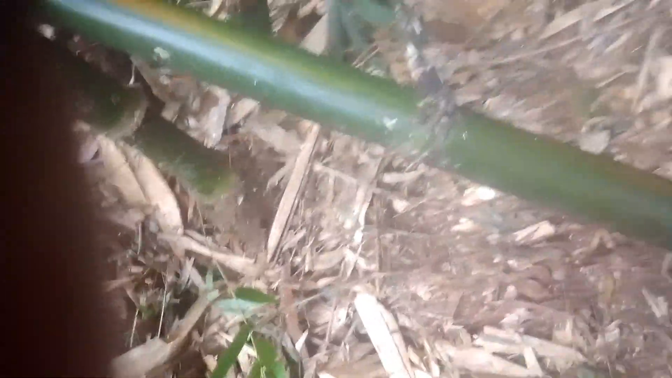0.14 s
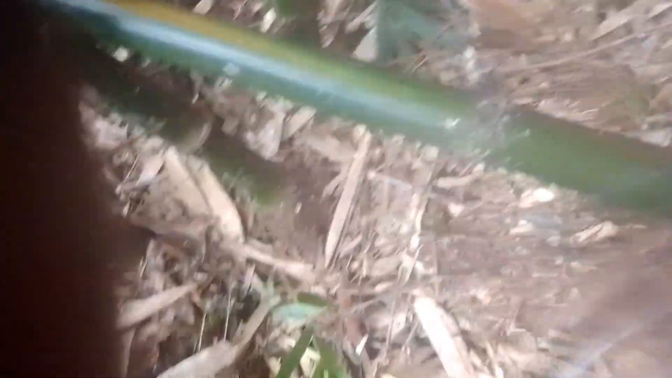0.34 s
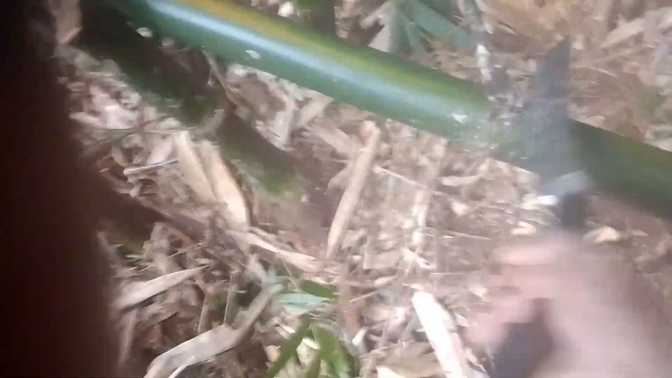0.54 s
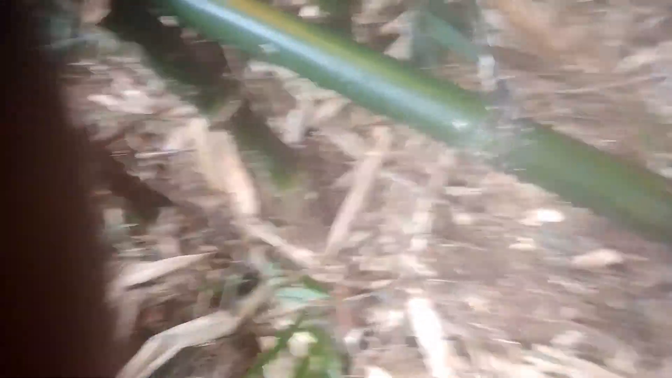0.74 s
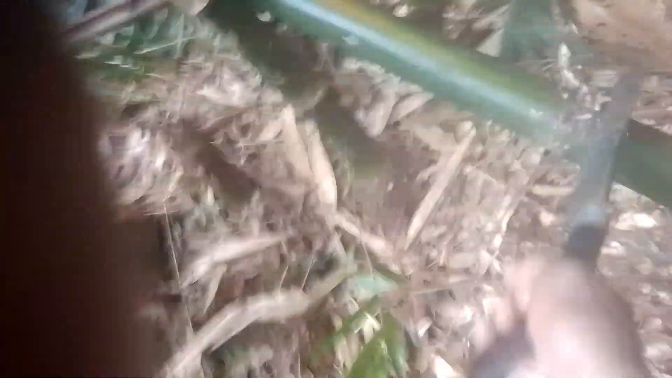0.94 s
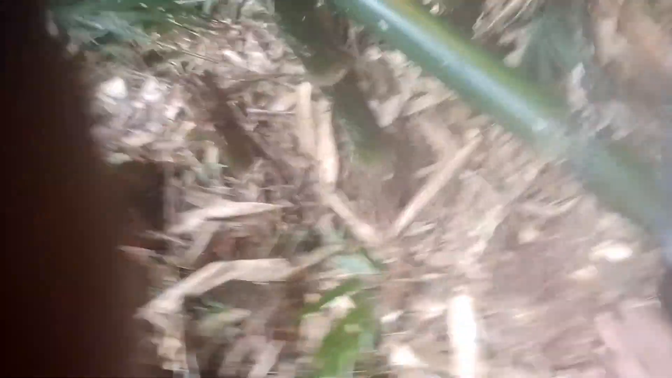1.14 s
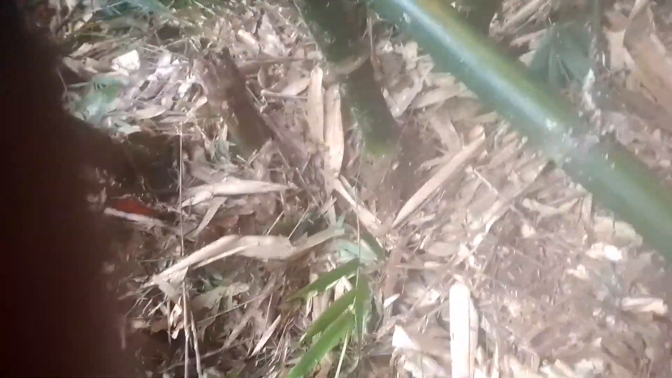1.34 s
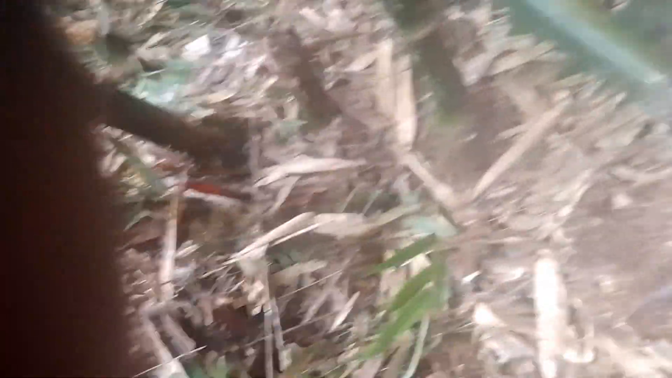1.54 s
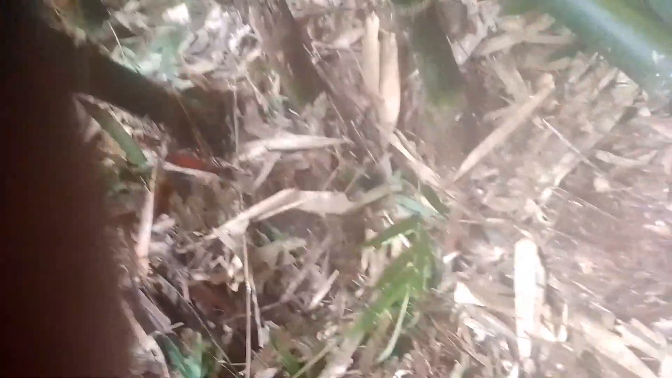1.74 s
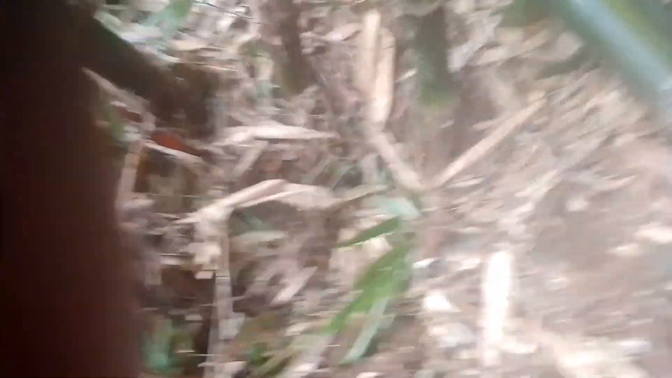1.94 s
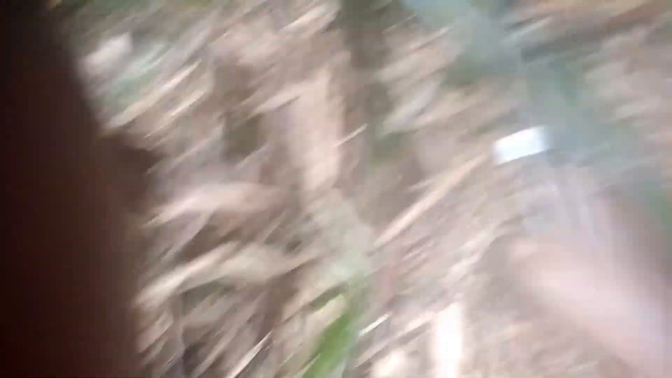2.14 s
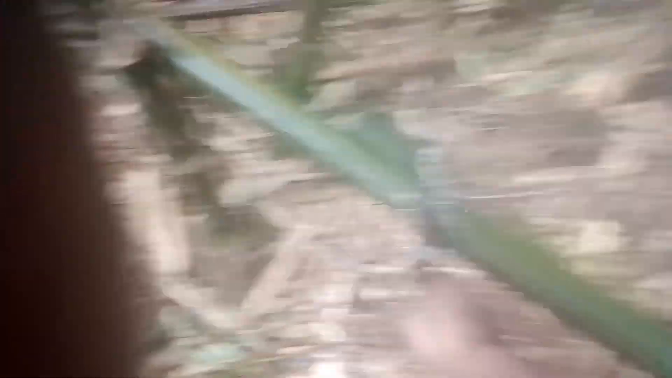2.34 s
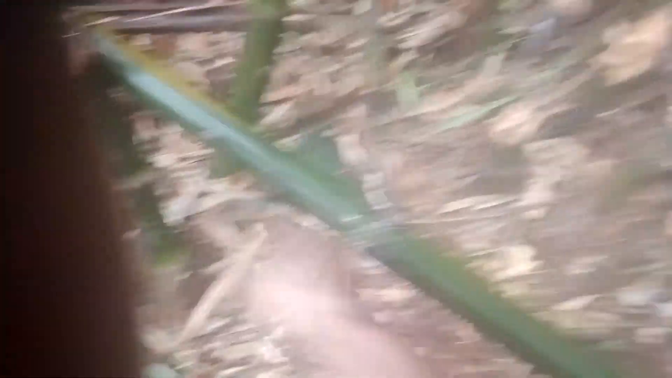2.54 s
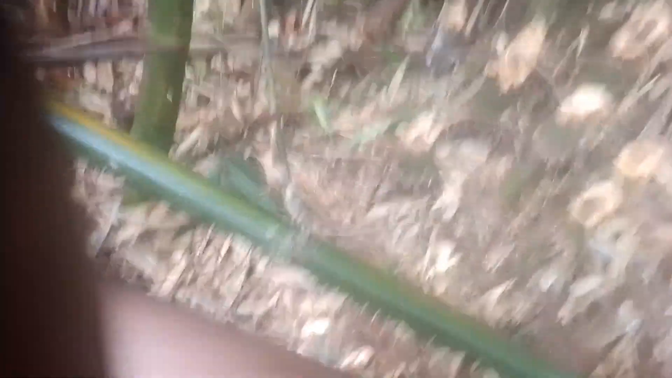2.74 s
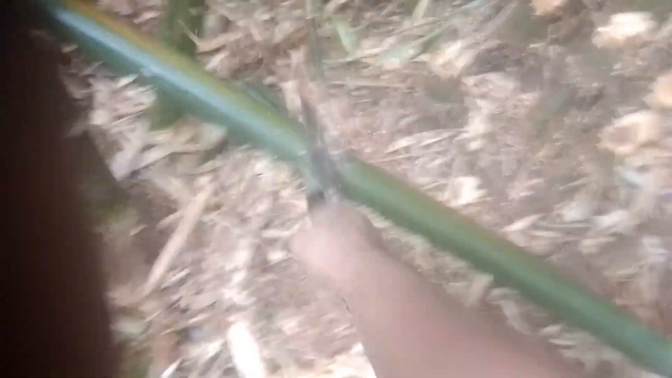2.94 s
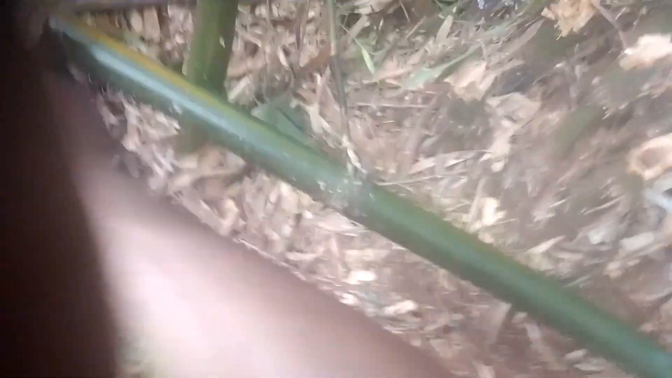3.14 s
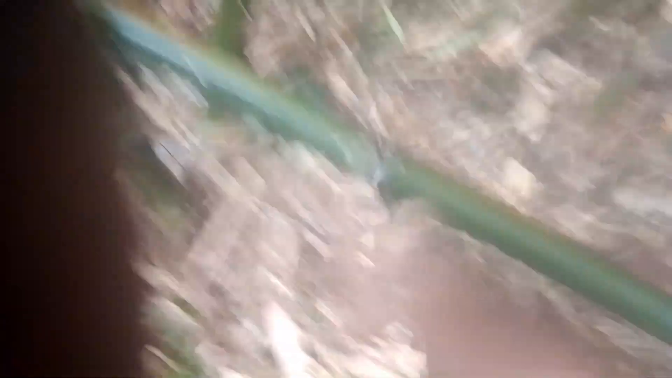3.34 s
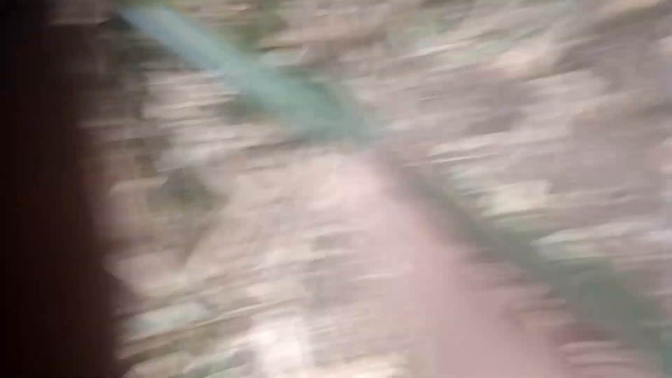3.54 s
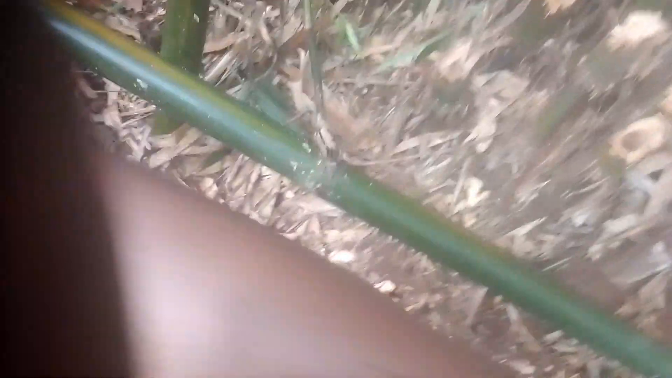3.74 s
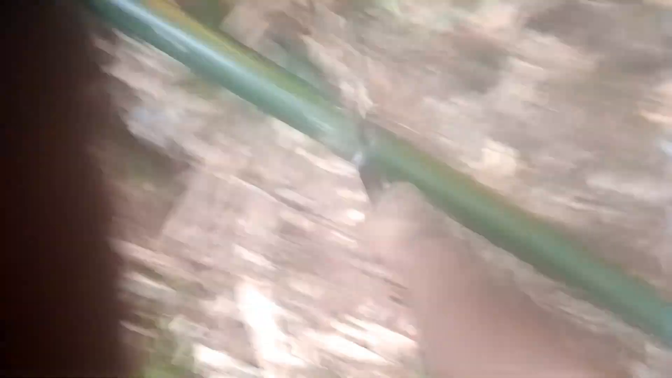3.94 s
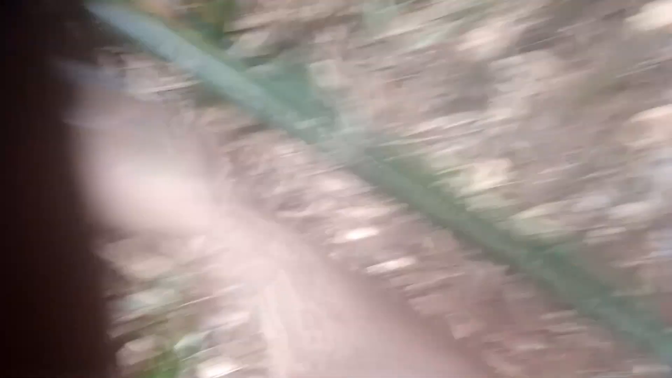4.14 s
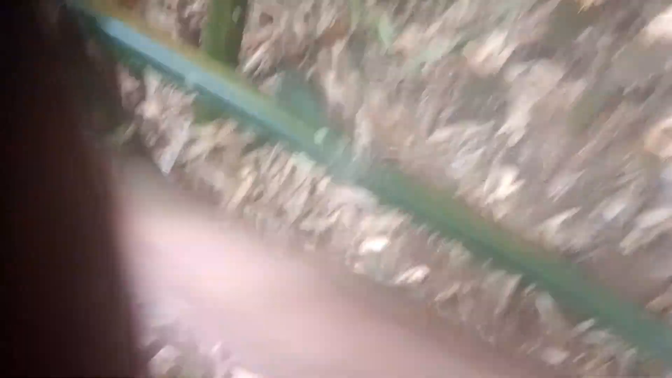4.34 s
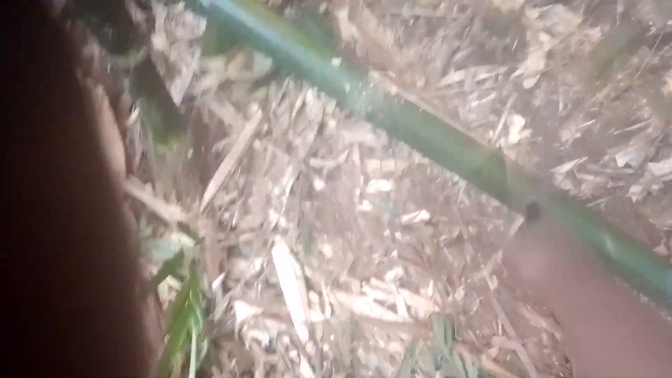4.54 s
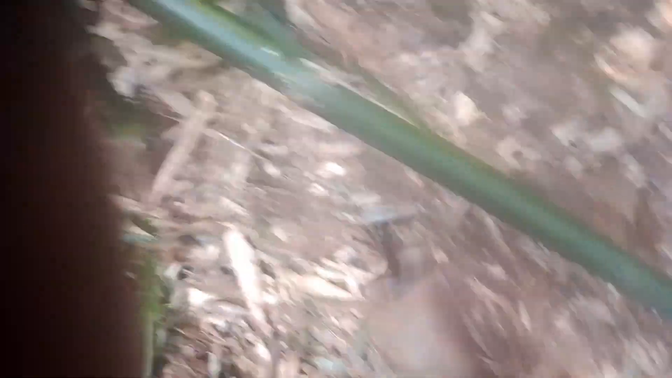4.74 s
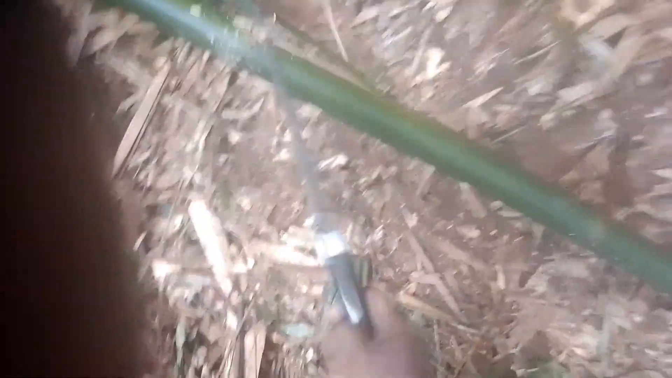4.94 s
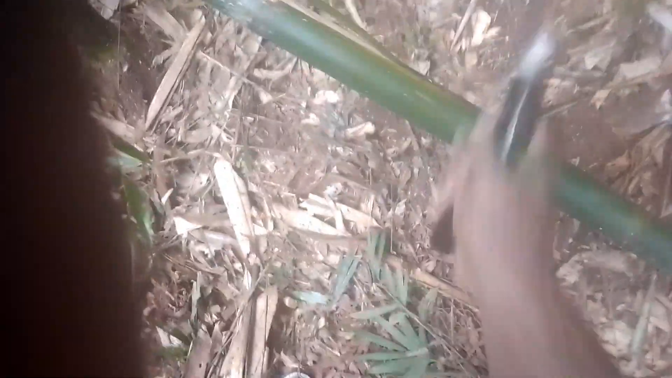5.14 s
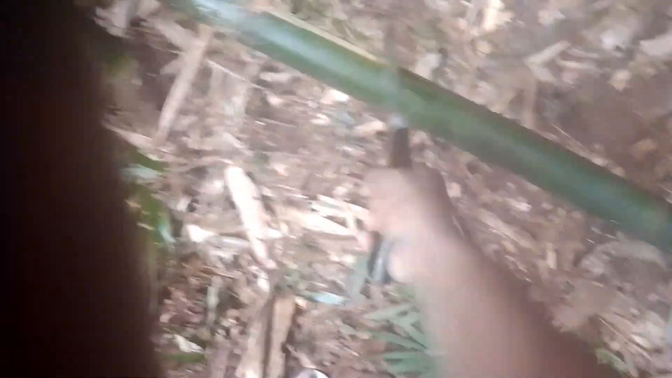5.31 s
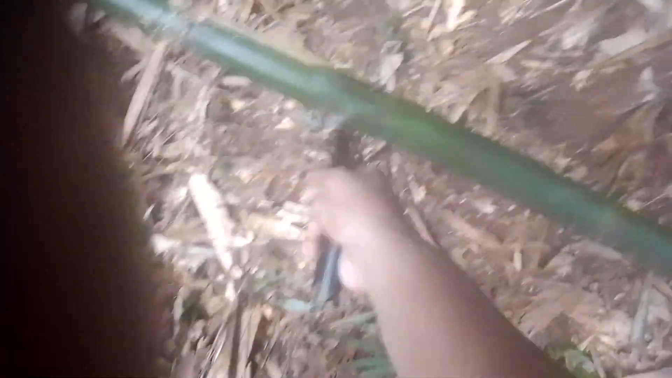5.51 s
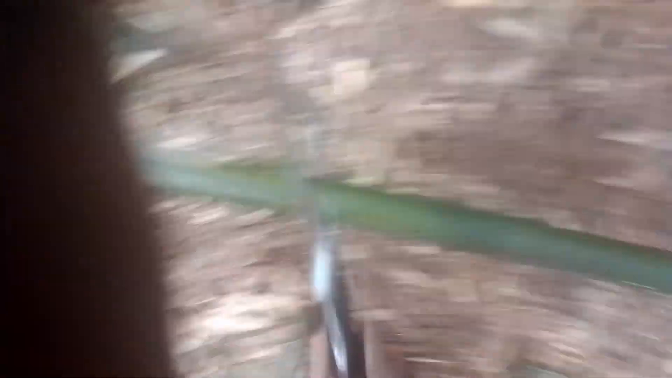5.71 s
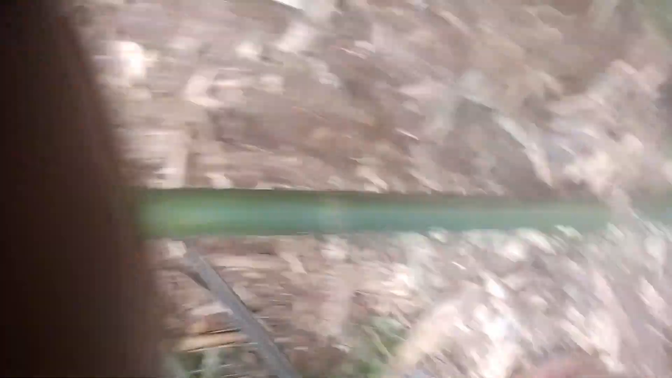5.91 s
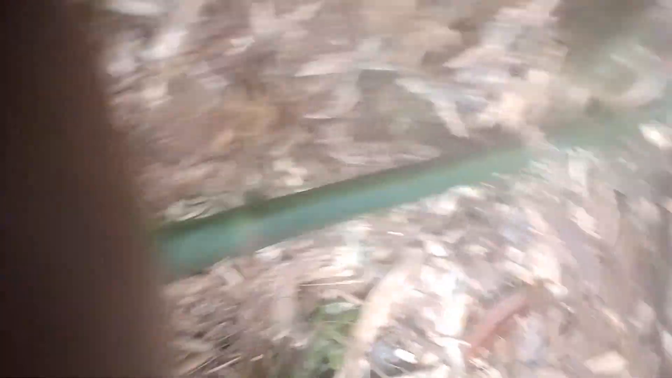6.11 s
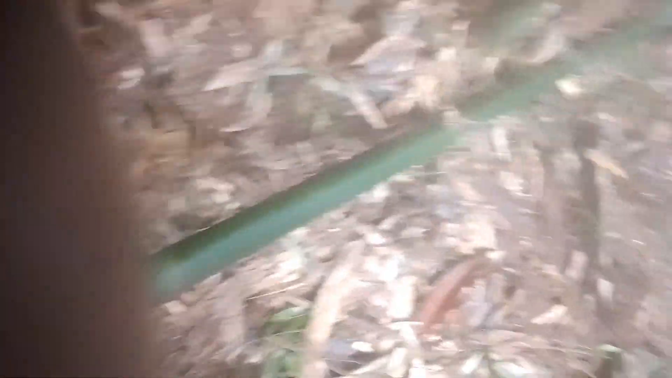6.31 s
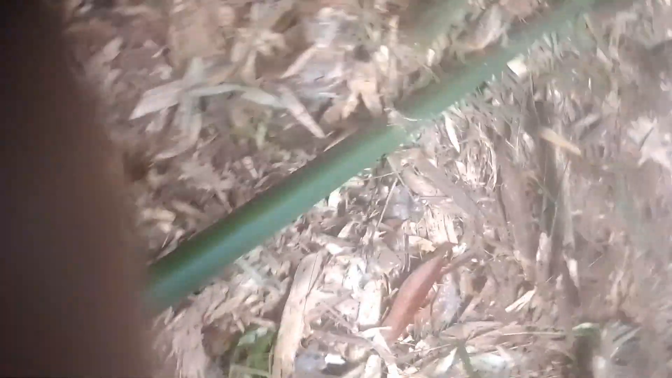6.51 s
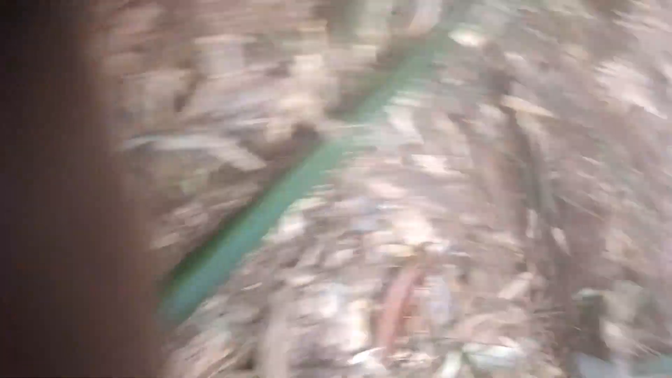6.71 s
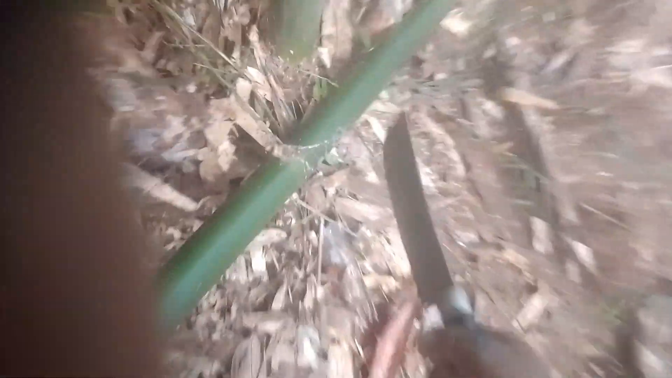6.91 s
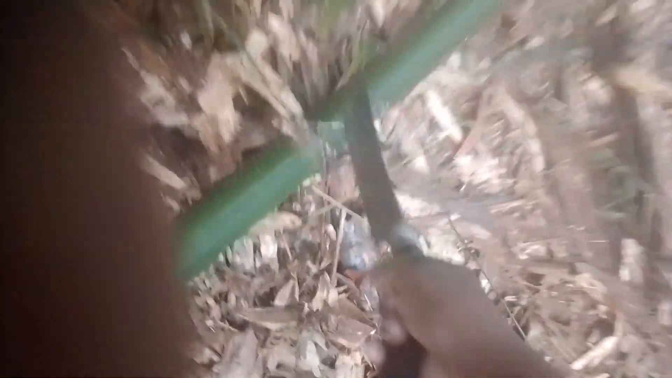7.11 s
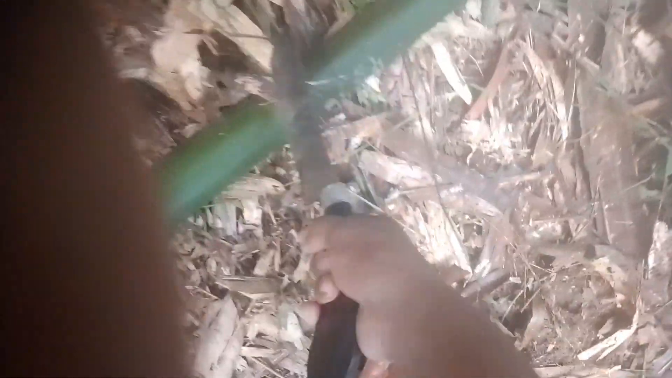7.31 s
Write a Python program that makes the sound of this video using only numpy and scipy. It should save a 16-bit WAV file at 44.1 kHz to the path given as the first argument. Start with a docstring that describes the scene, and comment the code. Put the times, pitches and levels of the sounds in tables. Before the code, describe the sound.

Hard, close knife strikes ring on hollow bamboo in a leafy grove; the stem splits, takes two lower-toned hits, and rustles down.

```python
"""Bamboo grove: a machete chops a green pole at arm's length. Each blow is an edge pulse, tearing-fibre noise,
damped modes of the hollow stem and a low push; the grove answers with decaying noise echoes.
The pole splits, takes two more blows and swings down through dry leaves, ending on a faint touch of the blade.
Leaf-like noise rises and falls and swells after blows; insects shrill steadily in narrow noise bands.
A hand bumps the camera, whose limiter catches the peaks."""
import sys
import numpy as np
from scipy import signal
from scipy.fft import rfft, irfft, next_fast_len
from scipy.io import wavfile
from scipy.ndimage import uniform_filter1d, minimum_filter1d, map_coordinates

SR = 44100
rng = np.random.default_rng(int(sys.argv[2]) if len(sys.argv) > 2 else 0)


def persist_wave(psi):
    """Save psi, clipped to +-1, as 16-bit WAV."""
    counts = np.round(np.clip(psi, -1, 1) * 32767).astype(np.int16)
    wavfile.write(sys.argv[1], SR, np.atleast_2d(counts).T)


N = 329310

# All dB columns are relative levels.
# Low air rumble: (frequency [Hz], density [dB per Hz])
RUMBLE_COLOUR = [(15, -18.5), (55, -1.5), (110, -1.5), (180, -10), (400, -11.5), (1500, -36.5)]
# Insect bands: (centre [Hz], half-width at -6 dB [Hz], level [dB])
INSECT_BANDS = [(3473, 88, -58), (6870, 220, -70.5), (13350, 190, -68), (14270, 210, -65)]
# Lower leaf noise: (frequency [Hz], density [dB per Hz])
RUSTLE_COLOUR = [(88, -4.5), (150, -3.5), (271, -12), (409, -10.5), (496, -5.5), (2690, -9), (3530, -9.5),
                 (4000, -16), (5200, -40.5), (8800, -120)]
# Upper leaf noise: (frequency [Hz], density [dB per Hz])
HISS_COLOUR = [(2500, -20), (4200, 4), (6000, 0.5), (8000, 0), (9500, -7.5), (12500, -13), (16000, -25.5)]
# Slow rise and fall of the background leaf-like noise: (time [s], level [dB])
NOISE_LEVEL = [(0.1, -72.5), (.7, -53.5), (1.6, -57.5), (2.2, -54), (2.8, -60.5), (3.25, -52.5),
               (3.85, -61), (4.4, -64.5), (4.75, -56.5), (5.3, -64), (5.8, -62), (6.25, -61), (6.7, -75),
               (6.95, -58.5), (7.47, -72)]
# Dry leaves crushed and brushed: (time [s], length [s], level [dB], centre [Hz])
LEAF_BRUSHES = [(0.305, 0.042, -46.5, 1900), (4.846, 0.14, -52.5, 6000), (4.854, 0.06, -54.5, 750),
                (5.139, 0.1, -42, 1300), (5.39, 0.08, -58, 1900), (5.605, 0.21, -61, 7000),
                (5.681, 0.2, -51.5, 1080), (5.894, 0.061, -58.5, 4500), (6, 0.12, -58.5, 2970),
                (6.19, .14, -56.5, 1050), (6.792, 0.17, -64, 5100), (6.853, 0.35, -63.5, 1540)]
# Hand knocks on the camera: (time [s], level [dB], brightness limit [Hz])
HAND_BUMPS = [(3.817, -11, 190), (3.832, 0.5, 800), (7.388, -9.5, 149), (7.415, -13, 169),
              (7.441, -7.5, 150)]
# Heavily damped camera-body modes: (frequency [Hz], level [dB])
BODY_MODES = [(100, -14.5), (170, -18), (308, -19.5), (616, -13.5)]
# Ringing of the grove: (frequency [Hz], t60 [s])
GROVE_DECAY = [(150, 0.6), (500, 0.51), (1500, 0.7), (4000, 0.59), (12000, 0.54)]
# Spectrum of the grove's answer: (frequency [Hz], gain [dB])
GROVE_GAIN = [(60, -2.5), (250, -3), (700, 1.5), (1800, -0.5), (4000, 4), (8000, 7.5), (14000, 0)]
# Light blade contacts: (time [s], level [dB], brightness limit [Hz])
BLADE_TAPS = [(5.073, -19.5, 4630), (7.3254, -28, 1920)]
# Steel against the stem: (frequency [Hz], level [dB], t60 [s])
BLADE_MODES = [(677, -4, 0.048), (1436, -0.5, 0.047), (1710, -7, 0.013), (1680, 0, 0.054),
               (1870, -0.5, 0.049), (2060, -5, 0.07), (2620, -5.5, 0.0325), (3150, 0, 0.034),
               (3930, -5.5, .04), (5940, -18, .035)]
# Splitting fibres, twigs, chips: (time [s], body [dB], snap [dB], crisp [dB], t60 [s])
BREAKS = [(1.187, -54, -45, -50.5, 0.048), (2.549, -56, -46.5, -56, 0.056), (2.858, -42, -55, -45, 0.014),
          (3.337, -42, -52, -47, 0.015), (3.689, -64, -37.5, -48, 0.0064), (4.534, -40.5, -43, -38, 0.14),
          (4.678, -26.5, -25.5, -31, 0.053), (4.862, -48, -62, -39, .025), (5.016, -68, -53, -47.5, .03),
          (5.073, -43, -28.5, -42, 0.19), (5.12, -41.5, -27.5, -30.5, 0.099),
          (5.159, -41.5, -31, -42, 0.11), (5.224, -48, -49, -53, 0.087), (5.728, -58, -60, -53, 0.02),
          (5.877, -53, -57.5, -81, 0.18), (6.056, -55, -49, -61, 0.052), (6.126, -60, -51, -58, 0.03),
          (6.314, -65, -56.5, -61, 0.048), (6.385, -72, -61, -59, .04), (6.587, -50.5, -48.5, -62, 0.04),
          (6.879, -57, -47.5, -57, 0.13)]
# Bands of body, snap, crisp: (low edge [Hz], high edge [Hz])
BREAK_BANDS = [(250, 650), (650, 3000), (3000, 10000)]
# Blows: (time [s], thud [dB], hollow [dB], knock [dB], clack [dB], crack [dB], bite time [s],
#         stem ring [dB], grove echo [dB], leaves shaken [dB])
BLOWS = [(0.4134, -38, -16.5, -11.5, -14, -27.5, 0.0094, 0, 2.5, -41.5),
         (.905, -29, -15.5, -14.5, -14.5, -25.5, 0.017, 4, 3.5, -40),
         (1.615, -28, -18, -20, -9.5, -22, 0.0047, 2.5, 2, -43.5),
         (2.2964, -53, -21, -23.5, -15.5, -21.5, 0.0062, -25, -7, -54),
         (2.3322, -49, -22.5, -17, -21.5, -32, 0.0023, -13, -13, -55),
         (2.8967, -30, -19.5, -17.5, -13.5, -24, 0.026, -1.5, 7.5, -54),
         (3.373, -14.5, -19.5, -24, -16.5, -21, 0.022, -8, 5.5, -44),
         (3.9726, -25, -21, -16.5, -18, -21.5, 0.025, -7.5, 5.5, -43.5),
         (4.4667, -17, -25, -21.5, -14, -23.5, 0.022, -9.5, 2, -39.5),
         (5.341, -44, -16, -14, -15.5, -21.5, 0.0033, -2.5, -3, -55.5),
         (5.561, -42, -20, -16.5, -24.5, -22.5, 0.0064, -5.5, -5.5, -60.5),
         (7.3239, -44, -29.5, -34, -41.5, -45, 0.0031, -52, -19, -72)]
# Blow bands: bass (hollow - 13 dB), hollow, knock, clack, crack: (low edge [Hz], high edge [Hz])
BLOW_BANDS = [(30, 160), (250, 650), (650, 1400), (1400, 3000), (3000, 10000)]
# Nominal stem modes: (frequency [Hz], level while whole [dB], level once split [dB], t60 [s])
STEM_MODES = [(167, -35, -13, 0.12), (284.7, -8.5, -10, 0.39), (370, -14.5, -0.5, 0.2),
              (428.5, -5, -5, 0.16), (514.6, -5, 0.5, 0.13), (591, -13.5, -8.5, 0.2), (671, -7, 0, 0.088),
              (772, 0, -5, 0.084), (944, 0.5, -19, 0.051), (976, -6.5, -8.5, 0.13), (1041, -8, -10, 0.059),
              (1068, 1.5, 10, 0.033), (1156, 1, -19, 0.067), (1547, -9.5, 15, 0.018), (1561, -1, 6.5, 0.05),
              (1808, -3, -10, 0.079), (2183, 4.5, 7, 0.035), (2500, -10, -25, 0.084),
              (3187, -4, -28, 0.049)]
# Dense ringing of the stem wall: (frequency [Hz], t60 [s])
WALL_DECAY = [(60, .11), (300, 0.21), (900, .12), (2000, 0.088), (4000, 0.051), (12000, 0.078)]
# Microphone response: (frequency [Hz], gain [dB])
MICROPHONE_GAIN = [(30, 3), (110, 0), (170, 0.5), (270, 1.5), (4000, 1), (6200, -3), (7700, 2), (9500, -4),
                   (12000, -7.5), (15000, -2)]

SHAKE_RISE_S, SHAKE_FALL_DB_PER_S = 0.11, 64.5
BITE_FADE_DB = 2  # the blade slows as it sinks in
SPLIT_S = 5.1
TOP_HZ = 15700


def amp(db):
    """Amplitude of a level in dB."""
    return 10 ** (np.asarray(db) / 20)


def unit(x):
    """x scaled to rms 1."""
    return x / np.sqrt(np.mean(x ** 2) + 1e-20)


def clock_s(size):
    """Sample times [s]."""
    return np.arange(size) / SR


def along(points, hz):
    """Interpolate (frequency [Hz], value) points on a log axis."""
    f, v = np.transpose(points)
    return np.interp(np.log(hz + 1), np.log(f + 1), v)


def filtered(x, response):
    """x times a gain that depends on frequency."""
    m = next_fast_len(len(x) + 4096)
    return irfft(rfft(x, m) * response(np.fft.rfftfreq(m, 1 / SR)), m)[:len(x)]


def coloured(x, colour):
    """x through a (frequency [Hz], gain [dB]) colour."""
    return filtered(x, lambda hz: amp(along(colour, hz)))


def noise(colour):
    """Coloured noise of rms 1."""
    return unit(coloured(rng.standard_normal(N), colour))


def wobble(knots_per_s):
    """Smooth random curve."""
    return map_coordinates(rng.standard_normal(400), [clock_s(N) * knots_per_s], mode="wrap")


def uneven_gain(size, knots_per_s, depth_db):
    """Random jagged gain of rms 1, as when fibres part or leaves crackle one after another."""
    knots = rng.standard_normal(2048)
    curve = map_coordinates(knots, [clock_s(size) * knots_per_s], order=1, mode="wrap")
    return unit(amp(depth_db * curve))


def add(track, s, sound):
    """Mix a sound into the track at time s."""
    part = track[max(round(s * SR), 0):][:len(sound)]
    part += sound[:len(part)]


def density(bands, levels_db):
    """Band levels as (frequency [Hz], gain [dB]) for white noise."""
    return [(np.sqrt(lo * hi), db - 10 * np.log10(2 * (hi - lo) / SR))
            for (lo, hi), db in zip(bands, levels_db)]


def dense_ringing(colour, decay, hold_s, size):
    """Noise that holds, then dies at its own speed at each frequency."""
    hz, t, z = signal.stft(rng.standard_normal(size), SR, nperseg=128)
    z = z * amp(-60 * np.maximum(t - hold_s, 0) / along(decay, hz)[:, None])
    return coloured(signal.istft(z, SR, nperseg=128)[1][:size], colour)


def insects():
    """A distant chorus: narrow shrill noise bands that waver a little."""
    out = np.zeros(N)
    for centre_hz, width_hz, db in INSECT_BANDS:
        band = filtered(rng.standard_normal(N), lambda hz: 1 / (1 + ((hz - centre_hz) / width_hz) ** 2))
        out += amp(db + 0.4 * wobble(3)) * unit(band)
    return out


def shaking():
    """Every blow sets the leaves trembling: quick swell, then steady fall; powers add."""
    power, t = np.zeros(N), clock_s(2 * SR)
    settling = amp(-SHAKE_FALL_DB_PER_S * np.maximum(t - SHAKE_RISE_S, 0))
    swell = np.minimum(t / SHAKE_RISE_S, 1) * settling
    for s, *_, shaken_db in BLOWS:
        add(power, s, (amp(shaken_db) * swell) ** 2)
    return np.sqrt(power)


def leaves(rustle_db=4, hiss_db=0.0, shaken_hiss_db=-11, calm_db=-64, rumble_db=-57):
    """Grainy leaf-like noise that rises and falls and swells after blows, over a low rumble of air."""
    level = amp(np.interp(clock_s(N), *np.transpose(NOISE_LEVEL)))
    shake = shaking()
    stir = amp(0.8 * wobble(10))
    rustle = np.sqrt((amp(rustle_db) * level) ** 2 + shake ** 2 + amp(calm_db) ** 2)
    hiss = np.hypot(amp(hiss_db) * level, amp(shaken_hiss_db) * shake)
    low = rustle * noise(RUSTLE_COLOUR) * uneven_gain(N, knots_per_s=170, depth_db=1.5)
    high = hiss * noise(HISS_COLOUR) * uneven_gain(N, knots_per_s=66, depth_db=1.1)
    return stir * (low + high) + amp(rumble_db) * noise(RUMBLE_COLOUR)


def crackles(per_s=16, over_db=6, spread_db=3, centre_hz=2600, life_s=0.0017):
    """Random dry ticks of decaying noise, louder when the background noise is louder."""
    out, t = np.zeros(N), clock_s(SR // 30)
    gaps, sizes = rng.exponential(size=(300, 2)).T
    for s, size in zip(np.cumsum(gaps) / per_s, np.minimum(sizes, 2)):
        pitch_hz = centre_hz * 2 ** rng.uniform(-1, 1)
        tick = filtered(rng.standard_normal(len(t)), lambda hz: 1 / (1 + np.log2((hz + 1) / pitch_hz) ** 4))
        db = np.interp(s, *np.transpose(NOISE_LEVEL)) + over_db + spread_db * size
        add(out, s, amp(db) * unit(tick) * np.exp(-t / life_s))
    return out


def brushes(life_s=0.0019, grains_per_s=110):
    """Leaves give way in a swarm of tiny crackles, mostly weak and a few strong."""
    out, t = np.zeros(N), clock_s(SR // 2)
    for s, length_s, db, centre_hz in LEAF_BRUSHES:
        hits = rng.random(len(t)) < grains_per_s / SR
        sizes = hits * amp(5 * np.minimum(rng.exponential(size=len(t)), 3))
        decaying = signal.lfilter([1], [1, -np.exp(-1 / (life_s * SR))], sizes)
        grains = unit(decaying) + 0.53  # steady noise under the grains
        crackle = filtered(grains * rng.standard_normal(len(t)),
                           lambda hz: 1 / (1 + (1.1 * np.log2((hz + 1) / centre_hz)) ** 2))
        envelope = np.sqrt(np.abs(np.sin(np.pi * np.minimum(t / length_s, 1))))
        add(out, s, amp(db) * unit(crackle) * envelope)
    return out


def bumps(cycles=0.8):
    """Heavily damped modes of the camera body, duller when the touch is soft."""
    out, t = np.zeros(N), clock_s(SR // 8)
    hz, mode_db = np.transpose(BODY_MODES)[:, :, None]
    for s, db, limit_hz in HAND_BUMPS:
        modes = amp(db + mode_db) * np.sin(2 * np.pi * hz * t) * np.exp(-t * hz / cycles)
        dulled = modes / (1 + (hz / limit_hz) ** 4)
        add(out, s, dulled.sum(0) * (1 - np.exp(-t / .002)))
    return out


def grove(x, swell_s):
    """Scattered answer of surrounding stems, too thin to throw back much bass."""
    t = clock_s(SR // 2)
    tail = dense_ringing(GROVE_GAIN, GROVE_DECAY, 0, len(t)) * (1 - np.exp(-t / swell_s))
    return signal.fftconvolve(x, tail / np.linalg.norm(tail))


def thicket(x, t60_s):
    """A clump of stems some metres off throws back a short, grainy echo without bass."""
    t = clock_s(SR // 4)
    grain = uneven_gain(len(t), knots_per_s=310, depth_db=14.0)
    tail = rng.standard_normal(len(t)) * amp(-60 * t / t60_s) * grain
    echo = signal.fftconvolve(x, tail / np.linalg.norm(tail))
    return filtered(echo, lambda hz: hz ** 2 / (hz ** 2 + 450 ** 2))


def taps():
    """The blade only touches the stem: damped modes in a dry clink, duller when the contact is soft."""
    out, t = np.zeros(N), clock_s(SR // 6)
    hz, mode_db, t60_s = np.transpose(BLADE_MODES)[:, :, None]
    for s, db, limit_hz in BLADE_TAPS:
        wave = np.sin(2 * np.pi * (hz * t + rng.random(hz.shape)))
        modes = amp(db + mode_db - 60 * t / t60_s) * wave
        add(out, s, (modes / np.sqrt(1 + (hz / limit_hz) ** 6)).sum(0))
    return out


def snaps(snap_db=3, click_db=3):
    """Brittle breaks: one sharp tick and a short crackle of noise."""
    out, t = np.zeros(N), clock_s(SR // 4)
    for s, body_db, crack_db, crisp_db, t60_s in BREAKS:
        colour = density(BREAK_BANDS, [body_db, crack_db, crisp_db])
        bass_db, treble_db = colour[0][1], colour[-1][1]
        colour = [(40, bass_db - 9)] + colour + [(8500, treble_db - 3), (14000, treble_db - 17)]
        burst = coloured(rng.standard_normal(len(t)), colour)
        envelope = 1000 ** (-t / t60_s) + amp(click_db) * np.exp(-t / .001)
        grain = uneven_gain(len(t), knots_per_s=515, depth_db=-1)
        add(out, s, amp(snap_db) * burst * envelope * grain)
    return out


def struck(colour, size):
    """Edge impact: the sharpest causal (minimum-phase) pulse of a given colour."""
    cepstrum = irfft(np.log(amp(along(colour, np.fft.rfftfreq(4096, 1 / SR)))))
    cepstrum[1:2048] *= 2  # fold to minimum phase
    cepstrum[2049:] = 0
    return np.pad(irfft(np.exp(rfft(cepstrum))), (0, size - 4096))


def torn_wall(colour, bite_s, t):
    """Fibres tear while the blade bites, then the stem wall rings on densely."""
    wall = dense_ringing(colour, WALL_DECAY, bite_s, len(t))
    wall = wall * uneven_gain(len(t), knots_per_s=700, depth_db=2.5)
    wall = wall * amp(BITE_FADE_DB * (.5 - np.minimum(t / bite_s, 1)))
    # the treble cracks at once; the heavy stem takes a moment to move
    low = filtered(wall, lambda f: 1 / (1 + (f / 1400) ** 4))
    return wall - low * np.exp(-t / 0.00072)


def stem_ring(s, ring_db, knock_db, clack_db, t):
    """Damped modes of the hollow stem, rebalanced once it has split."""
    hz, whole_db, split_db, t60_s = np.transpose(STEM_MODES)[:, :, None]
    # the air column follows the weight of the blow, the wall modes its hardness
    drive_db = np.interp(hz, [300, 900, 2000], [ring_db, knock_db + 16, clack_db + 16])
    mode_db = whole_db if s < SPLIT_S else split_db
    level_db = mode_db + drive_db + rng.normal(0, 1.8, hz.shape)
    pitch_hz = hz * (1 + rng.normal(0, 0.0019, hz.shape))  # each blow rings at slightly different pitches
    wave = np.sin(2 * np.pi * (pitch_hz * t + rng.random(hz.shape)))
    modes = amp(level_db - 60 * t / t60_s) * wave
    return modes.sum(0) * (1 - np.exp(-t / 0.0057))


def pole_push(db, t):
    """The whole pole gives way once under the blade: a brief 60 Hz swing."""
    return amp(db) * np.sin(2 * np.pi * 60 * t) * t / 0.0049 * np.exp(1 - t / 0.0024)


def chops(wall_db=-1.0, modes_db=-14, edge_db=17, push_db=3.5, grove_db=-18, thicket_db=-21):
    """Each blow: the edge strikes, fibres tear, the stem rings and the grove answers."""
    out, t = np.zeros(N), clock_s(SR // 2)
    for s, thud_db, hollow_db, knock_db, clack_db, crack_db, bite_s, ring_db, echo_db, _ in BLOWS:
        colour = density(BLOW_BANDS, [hollow_db - 13, hollow_db, knock_db, clack_db, crack_db])
        treble_db = colour[-1][1]
        colour += [(8000, treble_db - 5), (10500, treble_db - 15), (15000, treble_db - 24)]
        blow = amp(edge_db) * struck(colour, len(t))
        blow = blow + amp(wall_db) * torn_wall(colour, bite_s, t)
        blow = blow + amp(modes_db) * stem_ring(s, ring_db, knock_db, clack_db, t)
        add(out, s, blow + pole_push(thud_db + push_db, t))
        add(out, s + .02, amp(echo_db + grove_db) * grove(blow, swell_s=0.0043))
        add(out, s + .064, amp(echo_db + thicket_db) * thicket(blow, t60_s=0.085))
    return out


def scene():
    """Insects, leaves, hand on the camera, small breaks with their echo, blows."""
    background = insects() + leaves() + crackles() + brushes() + bumps()
    breaks = snaps() + taps()
    echo = np.zeros(N)
    add(echo, .02, amp(-21.0) * grove(breaks, swell_s=.008))
    return background + breaks + echo + chops()


def record(dry, ceiling=.72, offset=-0.02):
    """Microphone colour, fast limiter, band limit, then the converter's small constant offset."""
    heard = coloured(dry, MICROPHONE_GAIN)
    need = np.minimum(1, ceiling / (np.abs(heard) + 1e-9))
    gain = uniform_filter1d(minimum_filter1d(need, size=41), size=41)  # sizes in samples
    return filtered(heard * gain, lambda hz: hz < TOP_HZ) + offset


dry = scene()
out = record(dry)
persist_wave(out)
```